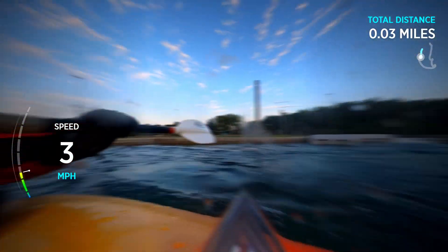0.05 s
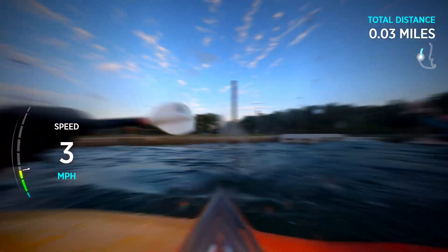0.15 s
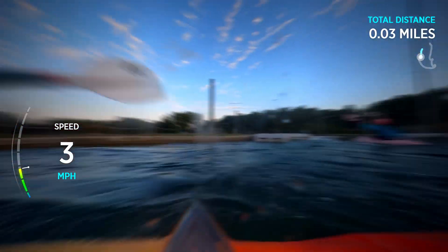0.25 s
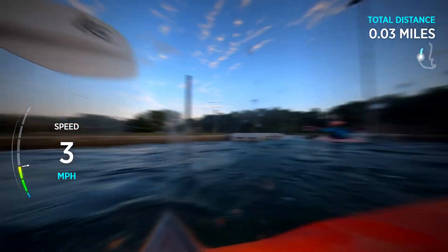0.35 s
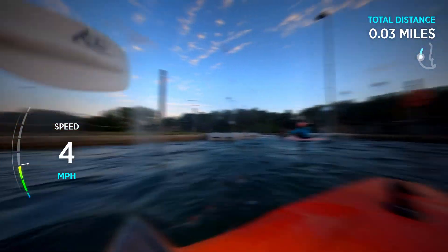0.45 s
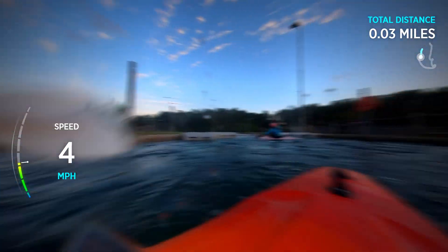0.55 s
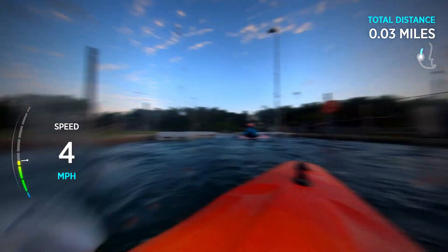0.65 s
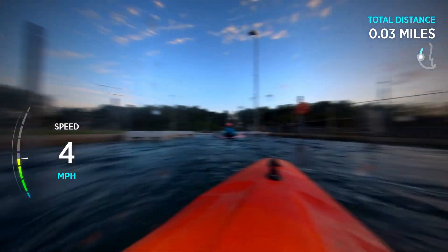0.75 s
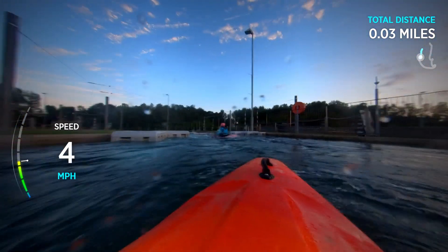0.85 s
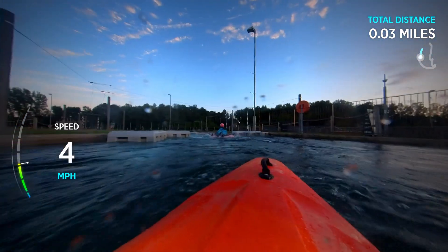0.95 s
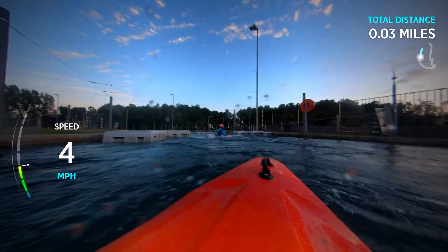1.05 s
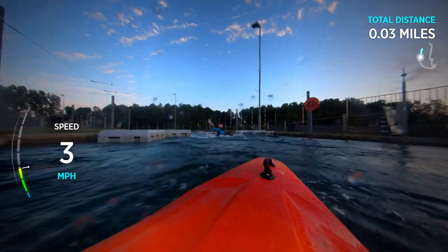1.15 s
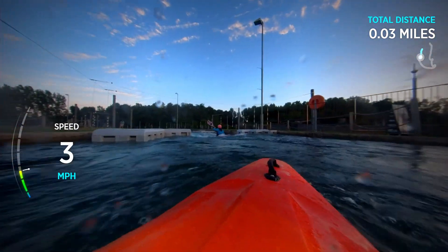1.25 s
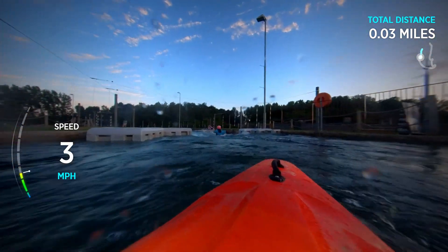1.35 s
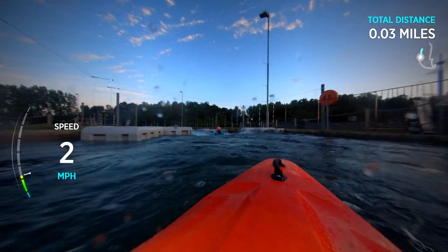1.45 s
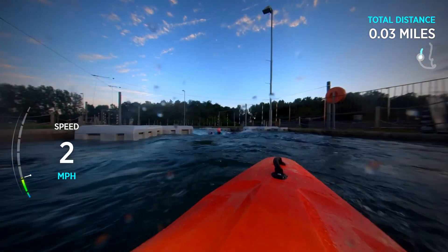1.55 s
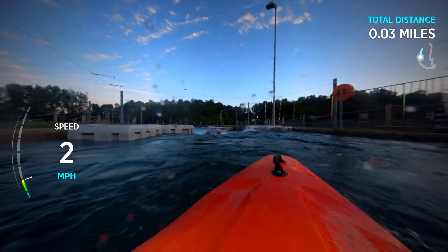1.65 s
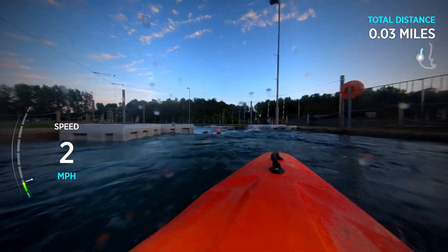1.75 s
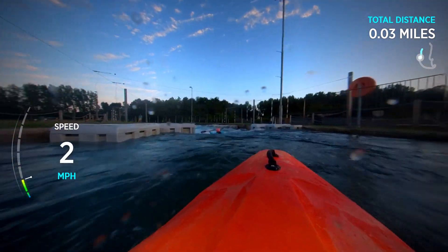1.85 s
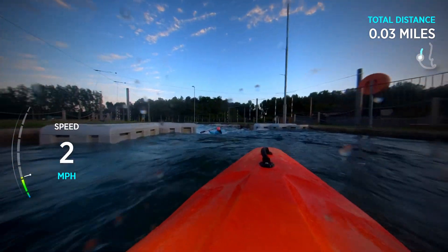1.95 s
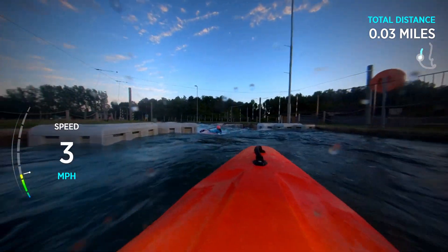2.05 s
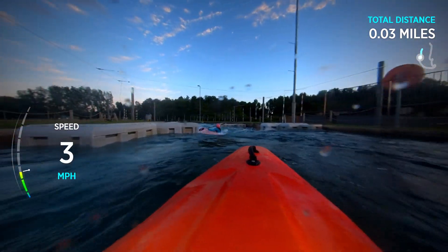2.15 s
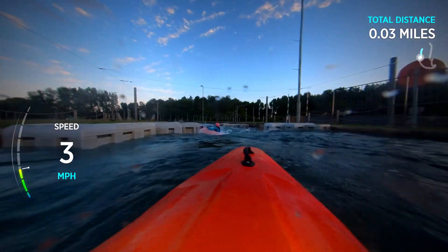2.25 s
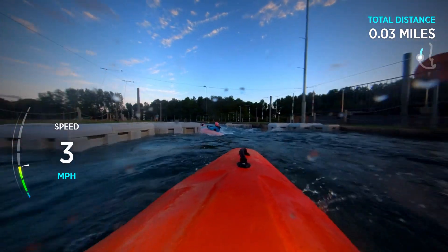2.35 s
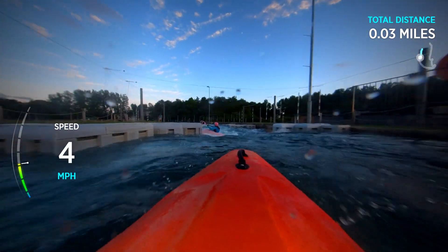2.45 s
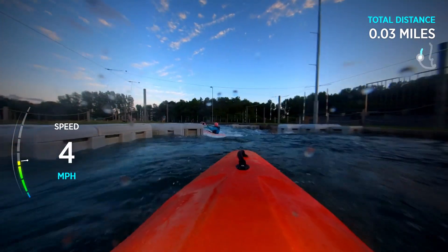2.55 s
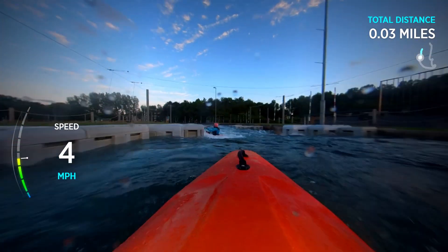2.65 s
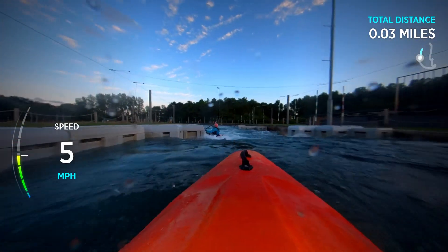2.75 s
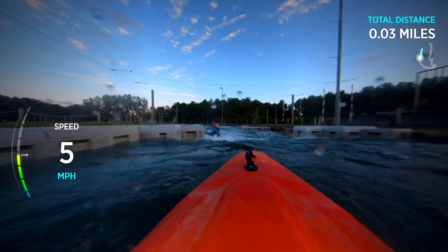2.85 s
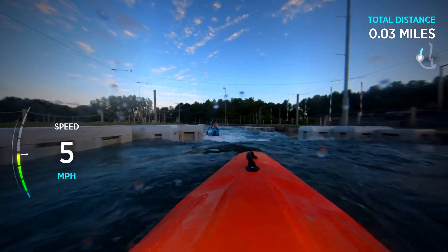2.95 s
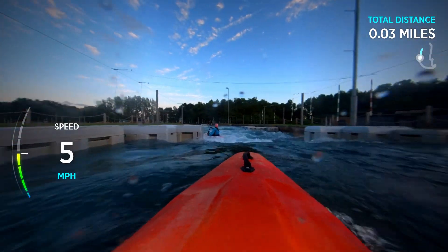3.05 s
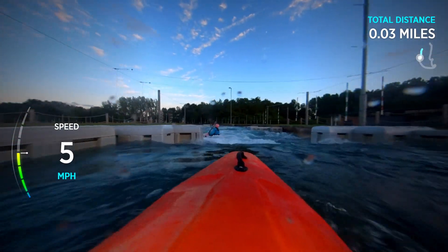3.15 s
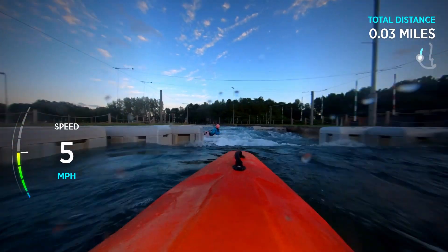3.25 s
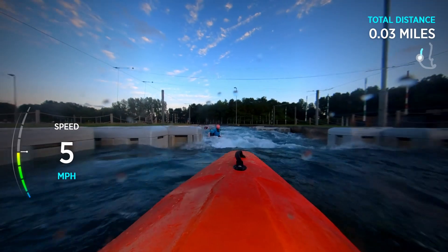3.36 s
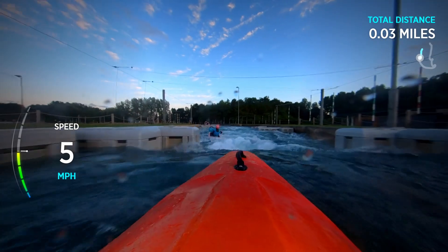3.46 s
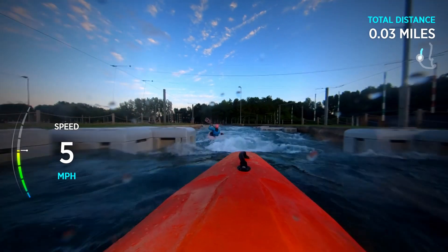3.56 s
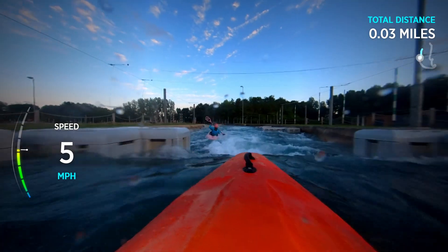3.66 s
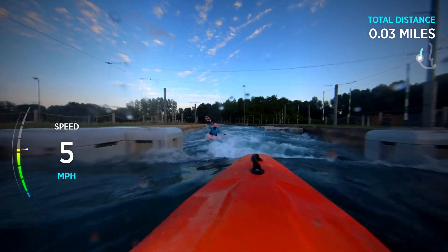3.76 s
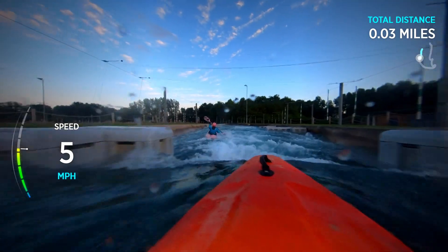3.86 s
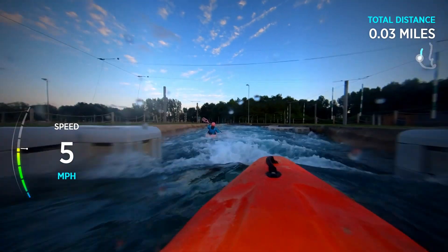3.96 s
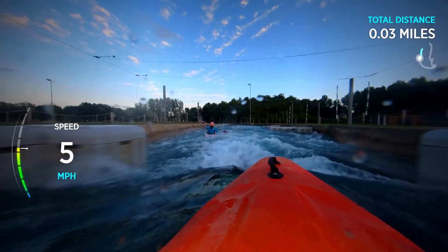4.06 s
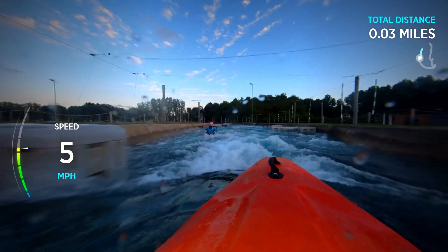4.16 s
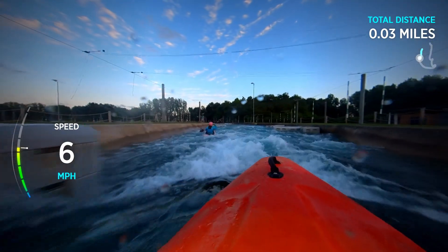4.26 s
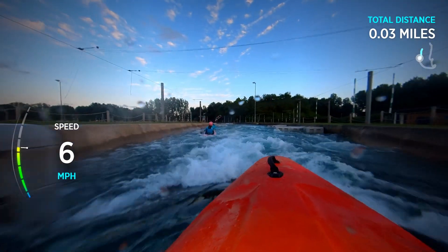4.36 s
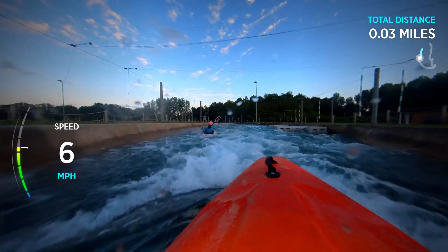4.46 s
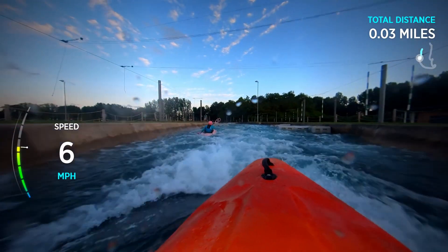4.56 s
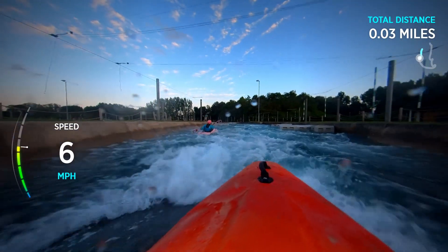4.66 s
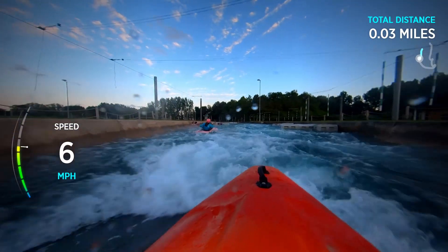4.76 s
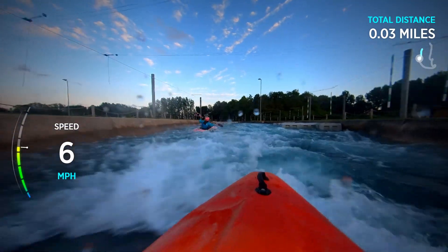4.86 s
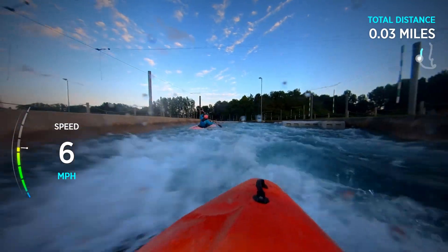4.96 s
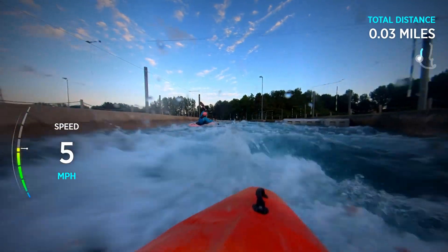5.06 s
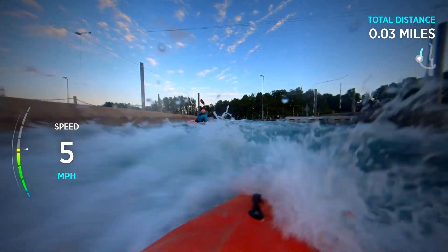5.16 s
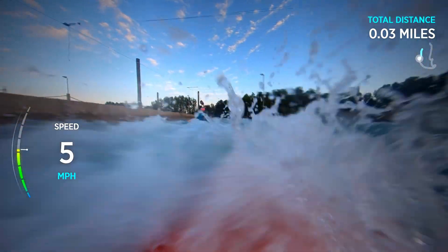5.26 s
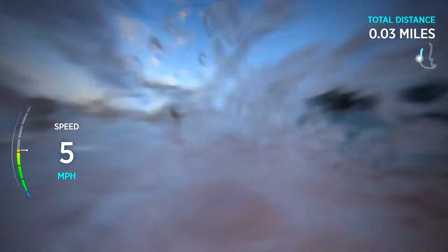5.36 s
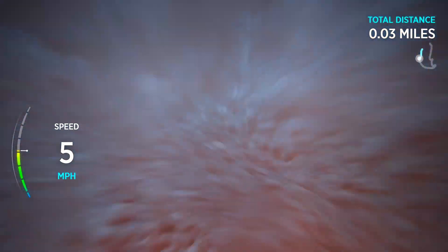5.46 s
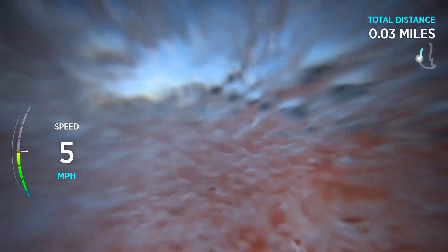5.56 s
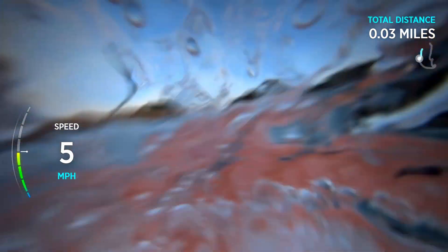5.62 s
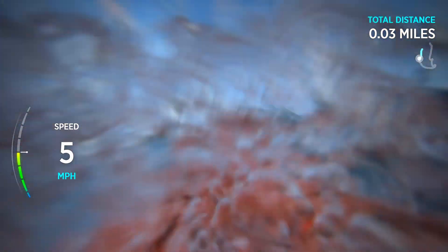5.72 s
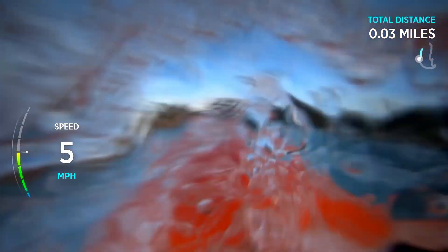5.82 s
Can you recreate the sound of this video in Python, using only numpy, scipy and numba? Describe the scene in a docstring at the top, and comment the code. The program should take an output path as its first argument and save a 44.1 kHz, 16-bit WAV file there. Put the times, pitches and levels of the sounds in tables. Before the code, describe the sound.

Water laps and rushes quietly along a plastic kayak, close and boxy through a sealed camera on the deck, with small bubbly plops and faint, brief sizzles. At about 1.2 seconds a hard, hollow knock thumps the hull, followed by a short low rumble as the mount rocks. The water stays soft, with lighter knocks, small slaps and single drops around 2.4 and 2.9 seconds. From 3.7 seconds the rush and the hiss of spray build steadily, with more bumps, a sharp drop tick near 4.6 seconds and a small splash just after. At 5.2 seconds a wave hits with several knocks and loud splashes. At 5.5 seconds it buries the bow in a gurgling, hissing wash, and drops pelt the case in a dense, sharp patter until the end, near 6 seconds.

```python
"""A sealed camera on a plastic kayak's deck, running from a pool into a breaking wave.
At first water laps and rushes quietly, ringing hull and case in fixed bands; the treble sizzles briefly,
air pockets plop. At 1.2 s a hard knock thumps the hull and the mount rocks. Lighter knocks, sheets of
water and single drops follow, and from 3.7 s the spray builds. At 5.2 s the wave hits with knocks
and splashes; at 5.5 s it buries the bow, and drops pelt the case to the end."""
import sys
import numpy as np
from scipy import signal
from scipy.fft import rfft, irfft
from scipy.io import wavfile
from scipy.ndimage import uniform_filter1d
from numba import njit

SR = 44100
rng = np.random.default_rng(int(sys.argv[2]) if len(sys.argv) > 2 else 0)


def dump(signal):
    """Clip the signal to [-1, 1] and save it as 16-bit WAV at the path in sys.argv[1]."""
    limited = np.clip(np.atleast_2d(signal).T, -1, 1)
    pcm = np.round(limited * 32767).astype(np.int16)
    wavfile.write(sys.argv[1], SR, pcm)


N = 259749

# resonances (centre [Hz], width [Hz], gain [dB])
SLOSH_BANDS = [(75.3, 27, 2), (175, 114, -3)]
HULL_BANDS = [(334.5, 39.8, -1.5), (254, 63, -12), (431, 99, -14)]
DECK_BANDS = [(580, 88, -8.5), (773, 108, 6), (889, 330, -7.5)]
GURGLE_BANDS = [(1255, 193, 2), (1580, 136, -5.5), (1905, 140, -18)]
CASE_BANDS = [(2550, 53, -13), (3010, 1180, -15), (3433, 273, -7), (4270, 430, -18)]
LID_BANDS = [(4800, 150, -10), (5285, 400, -3), (6860, 440, -5.5), (7050, 1330, -12.5)]
# lapping along the hull (time [s], hull drone [dB], slosh [dB])
LAPPING_LEVELS = [(0.0, -56.5, -67), (0.16, -70, -75), (0.39, -56, -72), (0.53, -56, -69), (0.7, -56, -70),
                  (0.95, -56.5, -69), (1.1, -52.5, -56.5), (1.24, -71, -59.5), (1.44, -58.5, -56),
                  (1.57, -57.5, -69.5), (2.07, -68.5, -77.5), (2.32, -70, -77), (2.52, -62.5, -69.5),
                  (2.81, -53, -58), (2.94, -79, -78), (3.08, -51.5, -57), (3.42, -66.5, -77),
                  (3.69, -61, -68), (3.98, -48, -56.5), (4.32, -57, -73), (4.52, -56.5, -78),
                  (4.68, -55, -75), (4.92, -50, -56.5), (5.12, -50.5, -54.5), (5.18, -47.5, -54),
                  (5.3, -45, -37), (5.4, -41.5, -38.5), (5.48, -36, -28.5), (5.53, -58, -49),
                  (5.59, -34.5, -31), (5.63, -39.5, -40.5), (5.77, -40.5, -33.5), (5.89, -47, -34.5)]
# flow over the deck (time [s], level [dB])
FLOW_LEVELS = [(0.0, -58.5), (0.31, -60.5), (0.56, -58.5), (0.67, -61), (1.71, -59), (1.86, -62),
               (2.12, -62), (2.69, -61), (2.78, -56.5), (3.11, -56), (3.23, -58), (3.81, -57.5),
               (4.09, -53), (4.47, -53.5), (4.87, -50.5), (5.05, -52.5), (5.12, -48), (5.2, -47.5),
               (5.28, -52), (5.36, -44), (5.48, -40.5), (5.53, -41), (5.59, -35.5), (5.64, -39),
               (5.77, -40), (5.89, -40)]
# spray around the case (time [s], mist [dB], hiss [dB])
SPRAY_LEVELS = [(0.0, -81, -78.5), (0.33, -87.5, -85), (0.91, -82.5, -84.5), (1.04, -74.5, -75.5),
                (1.2, -78, -79.5), (1.37, -78, -85), (1.59, -84.5, -83.5), (1.9, -85, -87),
                (2.1, -84, -81.5), (2.45, -79, -84), (2.65, -87, -83), (2.84, -74, -68.5),
                (3.04, -73.5, -77.5), (3.29, -76.5, -79), (3.52, -73.5, -82), (3.74, -69, -73),
                (3.87, -66.5, -67.5), (4.18, -66, -70), (4.49, -62, -66), (4.77, -61, -61),
                (5.07, -55.5, -60), (5.2, -55, -54.5), (5.27, -65.5, -61), (5.44, -54.5, -51.5),
                (5.5, -44, -39), (5.63, -46, -40), (5.77, -46, -37.5), (5.89, -49, -44.5)]
# mount on the swell (time [s], level [dB])
ROCKING_LEVELS = [(0.0, -83), (0.11, -53.5), (0.34, -81), (0.43, -70), (0.56, -78), (1.0, -80),
                  (1.21, -22.5), (1.28, -32), (1.31, -54), (1.46, -42.5), (1.54, -67), (1.72, -44.5),
                  (2.07, -77.5), (2.36, -61), (2.39, -53.5), (2.92, -54), (2.97, -35), (3.56, -67),
                  (3.87, -39.5), (4.1, -61), (4.15, -39), (4.38, -63.5), (4.61, -39), (4.92, -48.5),
                  (5.12, -28), (5.18, -47), (5.27, -26), (5.32, -50), (5.36, -26), (5.54, -57),
                  (5.58, -37.5), (5.89, -39)]


def water():
    """Rushing water rocks the mount and rings hull and deck; spray rings the case and its lid."""
    laps = patter(rate_hz=36, spread_db=4.0, tail_s=0.0024)
    drops = patter(rate_hz=51, spread_db=2.5, tail_s=0.004)

    rocking = undb(curve(ROCKING_LEVELS)) * mount_swing()
    slosh = undb(curve(LAPPING_LEVELS, column=2)) * rush(SLOSH_BANDS, laps, 0.59, 1.7)
    hull = undb(curve(LAPPING_LEVELS)) * rush(HULL_BANDS, laps ** 0.56, 0.6, 0.51)
    flow_db = curve(FLOW_LEVELS)
    flow = undb(flow_db) * rush(DECK_BANDS, laps ** 0.8, 0.97, 0.73)
    gurgle_db = submerge(flow_db, base_db=-65.5, slope=1.13, step_db=6.7)
    gurgle = undb(gurgle_db) * rush(GURGLE_BANDS, laps ** 0.73, 3.4, 2.6)

    mist_db, hiss_db = curve(SPRAY_LEVELS), curve(SPRAY_LEVELS, column=2)
    fine_db = submerge((mist_db + hiss_db) / 2, base_db=-61.5, slope=0.92, step_db=3.1)
    sparse = np.clip((-53.5 - mist_db) / 16, 0.25, 1)  # dense foam rings all bands evenly
    drops = drops ** (1.25 - sparse)  # more patter where foam flies
    hiss = undb(hiss_db) * rush(CASE_BANDS, drops ** 0.62, 1.9, 4.4 * sparse)
    fine = undb(fine_db) * rush(LID_BANDS[:2], drops ** 0.42, 4.6, 1.8 * sparse)
    mist = undb(mist_db) * rush(LID_BANDS[2:], drops ** 0.8, 3.1, 3.1 * sparse)
    return through_mount(rocking + slosh + hull + flow + gurgle) + hiss + fine + mist


def rush(bands, gusts, flicker_db, swell_db):
    """Turbulence rings each band; all share the gusts, each flickers and swells alone."""
    out = 0
    for hz, width_hz, db in bands:
        level_db = db + flicker_db * walk(16) + swell_db * walk(6)
        out = out + undb(level_db) * steep_band(gusts * rng.standard_normal(N), hz, width_hz)
    return unit(out)


def patter(rate_hz, spread_db, tail_s):
    """Gain that jumps as drops and small waves land, each dying over a short tail."""
    hits = (rng.random(N) < rate_hz / SR) * undb(spread_db * rng.exponential(size=N))
    fade = np.exp(-1 / (tail_s * SR))
    return np.sqrt(1 + signal.lfilter([1], [1, -fade], hits ** 2))


def mount_swing(hz=26.57):
    """The mount swings at its lowest mode with a fairly even stroke."""
    swing = steep_band(rng.standard_normal(N), hz, 13.67)
    swing /= np.abs(signal.hilbert(swing)) ** 0.83 + 1e-6
    return unit(bandpass(swing, hz, 45.0))


def submerge(control_db, base_db, slope, step_db, under_s=5.5, sink_s=0.026):
    """Level in dB that rises with a control and steps up as the bow goes under."""
    under = np.clip((np.arange(N) / SR - under_s) / sink_s, 0, 1)
    return base_db + slope * (control_db + 60) + step_db * under


# hull and mount modes (frequency [Hz], gain [dB], t60 [s])
EDGE_MODES = [(715.5, -1.5, 0.068), (838, 8, 0.019), (990, -20, 0.045), (1158, -11, 0.041)]
THUMP_MODES = [(295.4, 1, 0.14), (334, 6.5, 0.058), (426, -8.5, 0.046)]
THUD_MODES = [(166.3, 5, 0.073), (193.2, -8.5, 0.21)]
BOOM_MODES = [(66.4, -4, 0.18), (82.7, -4, 0.19), (112.4, -16.5, 0.41)]
ROCK_MODES = [(26.57, -27.5, 1), (32.2, -5, 0.35)]
# blows (time [s], thump peak [dB], boom [dB re thump], thud [dB re thump], edge [dB re thump])
HULL_KNOCKS = [(0.369, -43.5, -3.5, -7.5, 3), (0.925, -39.5, -28, -11, -18),
               (1.168, -12.5, -13.5, -4, -14.5), (1.189, -29.5, 1.5, -19, -18), (2.376, -30, 1, -2, 9.5),
               (2.927, -26, -5.5, -2, 3.5), (2.966, -32, 1.5, -14, 0.5), (4.09, -31.5, -8, -1.5, -1),
               (4.511, -35, -4.5, 1, -3), (4.565, -40, -6.5, -2, 3), (5.205, -22.5, -8.5, -4.5, -13),
               (5.235, -21, -0.5, -0.5, -21), (5.339, -28, -11.5, 0, -30), (5.45, -19.5, -9.5, -2, 3.5),
               (5.479, -45, -13, -24, -18), (5.586, -28, -4, -11, 4.5)]


def knocks(contact_s=0.0022):
    """Blows on the hull: edge and thump first, then boom, then the mount rocks on."""
    out, t = np.zeros(N), np.arange(SR // 20) / SR
    for start_s, db, boom_db, thud_db, edge_db in HULL_KNOCKS:
        # grinding contact strikes the edge many times
        grind = rng.standard_normal(len(t)) * t * np.exp(-2 * t / contact_s)
        edge = signal.fftconvolve(ring(EDGE_MODES, 0), grind)[:SR // 2]
        edge = peak(bandpass(edge, 634.0, 610.0), db + edge_db)
        thump = ring(THUMP_MODES, db)
        thud = ring(THUD_MODES, db + thud_db)
        rock = ring(ROCK_MODES, db + boom_db - 10.5)
        boom = ring(BOOM_MODES, db + boom_db)
        add(out, start_s, edge + thump + thud + rock + boom)
    return through_mount(out)


def ring(modes, peak_db, late_cycles=0.44, damp_db=3, damp_s=0.012):
    """Struck modes: each blow lands elsewhere and weights them anew; water damps them unevenly."""
    out, t = 0, np.arange(SR // 2) / SR
    for hz, db, t60_s in modes:
        size, detune = rng.standard_normal(2)
        age_s = np.maximum(t - late_cycles / hz, 0)  # bending waves are slower in the bass
        envelope = (1 - np.exp(-1.23 * hz * age_s)) * decay(age_s, t60_s)
        tone = np.sin(2 * np.pi * hz * (1 + 0.011 * detune) * age_s)
        out = out - undb(db + 1.9 * size) * envelope * tone
    damping = unit(smooth(rng.standard_normal(len(t)), int(damp_s * SR)))
    return peak(out * undb(damp_db * damping), peak_db)


# sheets of water (time [s], deck peak [dB], gurgle [dB re deck], case peak [dB], t60 [s])
WATER_SHEETS = [(0.039, -43.5, -9.5, -83, 0.16), (0.842, -45, -9, -85, 0.054),
                (0.906, -46.5, -4, -58, 0.075), (0.924, -41, -6, -55.5, 0.096),
                (1.384, -33, -3, -62, 0.076), (1.576, -43, -27, -94, 0.11),
                (2.376, -29.5, 0.5, -45.5, 0.069), (2.591, -57, 3, -85, 0.039),
                (2.609, -52, -2, -62.5, 0.22), (2.664, -45.5, -4.5, -58.5, 0.21),
                (2.712, -39, -8, -73, 0.081), (2.965, -35, -11, -52, 0.078), (3.049, -44.5, -13, -81, 0.07),
                (3.098, -40.5, -26, -68, 0.037), (3.27, -42.5, -20, -75, 0.026),
                (3.469, -64, -18, -63.5, 0.17), (3.672, -74, -17, -58, 0.084),
                (3.923, -46, -3.5, -56.5, 0.13), (4.227, -49.5, 0, -74, 0.082),
                (4.763, -38, 3, -41.5, 0.13), (4.784, -40, 6.5, -53, 0.063),
                (5.206, -30, -3.5, -37.5, 0.12), (5.233, -20, -1.5, -42, 0.049),
                (5.424, -20.5, 0.5, -21.5, 0.015), (5.453, -20, -20, -23.5, 0.12),
                (5.464, -32, 17.5, -23.5, 0.044), (5.477, -34, 9, -29, 0.12),
                (5.541, -40.5, 10, -28.5, 0.12), (5.585, -28, -3.5, -25, 0.095),
                (5.614, -47, -10, -29, 0.033), (5.635, -30, 7, -22, 0.014), (5.654, -23, -5, -25.5, 0.064),
                (5.735, -32, 5, -24, 0.038), (5.756, -27, -8, -22, 0.065), (5.788, -39, -5, -26, 0.059),
                (5.821, -42, 14.5, -23.5, 0.017)]


def sheets():
    """Sheets of water slap deck and case, ringing the bands of the rush at twice the width."""
    deck, case, t = np.zeros(N), np.zeros(N), np.arange(SR // 5) / SR
    for start_s, deck_db, gurgle_db, case_db, t60_s in WATER_SHEETS:
        hold_s = 0.13 * t60_s
        rise_s = 0.0002 + 0.074 * hold_s
        envelope = np.minimum(t / rise_s, 1) * decay(t - hold_s, t60_s)
        for out, bands, peak_db in ((deck, DECK_BANDS, deck_db),
                                    (deck, GURGLE_BANDS, deck_db + gurgle_db),
                                    (case, CASE_BANDS, case_db),
                                    (case, LID_BANDS[:2], case_db - 2),
                                    (case, LID_BANDS[2:], case_db - 8)):
            burst = envelope * rng.standard_normal(len(t))
            slap = sum(undb(db) * steep_band(burst, hz, 2 * width_hz) for hz, width_hz, db in bands)
            add(out, start_s, peak(slap, peak_db))
    return through_mount(deck) + case


# single drops on the case (time [s], peak [dB], centre [Hz], spread [oct])
CASE_DROPS = [(0.9055, -48.5, 3470, 0.27), (1.385, -45, 2320, 0.1), (1.402, -45, 2340, 0.2),
              (2.376, -38.5, 1970, 0.43), (2.732, -46, 4240, 0.091), (2.7632, -49.5, 2630, 0.42),
              (2.818, -51, 3730, 0.27), (2.8594, -51, 7750, 0.14), (2.9555, -33.5, 3280, 0.7),
              (3.1492, -53, 5000, 0.15), (3.1753, -46.5, 6960, 0.18), (3.216, -48, 3700, 0.7),
              (4.56, -23.5, 5000, 0.16), (4.5653, -33, 5130, 0.7), (5.236, -14, 4600, 0.44),
              (5.2424, -23, 3280, 0.45), (5.4256, -26.5, 3600, 0.41), (5.439, -23, 3520, 0.32),
              (5.466, -18, 5400, 0.59), (5.4891, -21, 3500, 0.43), (5.7492, -13, 5680, 0.4),
              (5.806, -20.5, 3620, 0.45), (5.8689, -13, 4850, 0.43)]


def drop_ticks(smear_s=0.002, lag_s=0.0014):
    """A drop's click crosses the case as a bending wave and arrives treble first."""
    out, t = np.zeros(N), np.arange(2048) / SR
    hz = np.maximum(np.fft.rfftfreq(len(t), 1 / SR), 100)
    delay_s = lag_s * np.maximum(np.log2(8000 / hz), 0) ** 1.4 + 0.00111
    dispersion = np.exp(-2j * np.pi * np.cumsum(delay_s) * SR / len(t))
    bands = CASE_BANDS[2], *LID_BANDS[:3]
    case = 0.2 + sum(1 / (1 + ((hz - band_hz) / width_hz) ** 2) for band_hz, width_hz, _ in bands)
    for start_s, db, centre_hz, spread_oct in CASE_DROPS + pelting():
        click = rng.standard_normal(len(t)) * np.exp(-t / smear_s)
        distance = (np.log2(hz / centre_hz) / max(spread_oct, 0.1)) ** 2
        colour = case * (np.exp(-distance) + 0.72 * np.exp(-distance / 9))
        tick = irfft(rfft(click) * colour * dispersion)
        add(out, start_s - 0.002, peak(tick, db))
    return out


def pelting(start_s=5.45, rate_hz=270, floor_db=-41, scatter_db=2.5):
    """The wave throws drops of random size and pitch at the case; rows as in CASE_DROPS."""
    gap, size, pitch = rng.random((400, 3)).T
    times_s = start_s - np.cumsum(np.log(1 - gap)) / rate_hz
    peaks_db = floor_db - scatter_db * np.log(1 - size)
    centres_hz = 750 * 2 ** (3.06 * pitch)
    return [(s, db, hz, 0.25) for s, db, hz in zip(times_s, peaks_db, centres_hz) if s < N / SR]


# trapped air (time [s], peak [dB], pitch [Hz], t60 [s])
AIR_POCKETS = [(0.363, -38, 1080, 0.027), (0.564, -43, 760, 0.042), (0.767, -45.5, 800, 0.052),
               (0.842, -57, 1650, 0.043), (0.938, -37, 765, 0.046), (0.9401, -42.5, 1820, 0.034),
               (1.3, -45, 900, 0.038), (1.392, -41, 860, 0.026), (1.59, -39, 767, 0.049),
               (1.6503, -51.5, 1760, 0.06), (2.592, -56, 1680, 0.045), (2.6636, -54.5, 2950, 0.023),
               (2.7132, -50, 1880, 0.032), (2.728, -44.5, 1990, 0.025), (2.733, -43, 780, 0.035),
               (2.7636, -53, 2540, 0.03), (2.9576, -37, 1594, 0.086), (4.621, -32, 912, 0.022),
               (4.77, -34.5, 1391, 0.09), (5.454, -31, 875, 0.04), (5.518, -29, 1130, 0.05),
               (5.67, -17.5, 877, 0.011), (5.753, -15, 1204, 0.058)]


def plops():
    """Air pockets ring briefly, a little hoarse, rising as they shrink; water muffles them."""
    out, t = np.zeros(N), np.arange(SR // 8) / SR
    for start_s, db, hz, t60_s in AIR_POCKETS:
        envelope = (1 - np.exp(-t / 0.0025)) ** 2 * decay(t, t60_s)
        tone = np.sin(2 * np.pi * hz * t * (1 + 1.36 * t))
        rasp = unit(steep_band(rng.standard_normal(len(t)), hz, 0.59 * hz))
        muffled = steep_band(envelope * (tone + 0.53 * rasp), hz, 0.35 * hz)
        add(out, start_s - 0.001, peak(muffled, db))
    return out


# narrow-band sizzles (time [s], level [dB], centre [Hz], hold [s])
TREBLE_SIZZLES = [(0.0, -78.5, 5280, 0.15), (0.0, -83, 3390, 0.12), (0.0, -82, 7360, 0.18),
                  (0.32, -85, 3430, 0.071), (0.534, -77.5, 5350, 0.1), (0.967, -74, 6820, 0.2),
                  (0.997, -80, 3470, 0.18), (1.302, -78, 3490, 0.13), (1.298, -70.5, 6850, 0.11),
                  (1.307, -80, 5070, 0.1), (1.86, -86, 3380, 0.099), (2.029, -80, 5230, 0.1),
                  (2.035, -82, 3400, 0.057), (2.607, -72.5, 6780, 0.16), (2.619, -71.5, 5100, 0.15),
                  (3.031, -75, 3450, 0.24), (3.042, -74, 6940, 0.23), (3.67, -68, 6940, 0.073),
                  (3.686, -71, 3470, 0.21)]


def sizzles(rise_s=0.005, t60_s=0.2, flicker_db=3.5):
    """Brief narrow-band treble sizzles start abruptly, flicker and fade."""
    out, t = np.zeros(N), np.arange(SR // 2) / SR
    for start_s, db, hz, hold_s in TREBLE_SIZZLES:
        envelope = np.minimum(t / rise_s, 1) * decay(t - hold_s, t60_s)
        sizzle = unit(steep_band(rng.standard_normal(len(t)), hz, 0.03 * hz))
        add(out, start_s, undb(db) * envelope * sizzle)
    return out * undb(flicker_db * walk(30))


def through_mount(x, cutoff_hz=2060):
    """Hull and mount pass little treble."""
    return signal.sosfilt(signal.butter(4, cutoff_hz, fs=SR, output="sos"), x)


@njit
def bandpass(x, hz, width_hz):
    """State-variable band-pass, gain 1 at the centre."""
    y, band, low = np.empty(len(x)), 0., 0.
    g, damping = np.tan(np.pi * hz / SR), width_hz / hz
    for i in range(len(x)):
        v = (band + g * (x[i] - low)) / (1 + g * (g + damping))
        band, low = 2 * v - band, low + 2 * g * v
        y[i] = damping * v
    return y


def steep_band(x, hz, width_hz):
    """Resonance with steep flanks."""
    for _ in range(3):
        x = bandpass(x, float(hz), 2.515 * width_hz)
    return x


def walk(rate_hz):
    """Smoothed random steps, spread near 1."""
    hold = int(SR / rate_hz)
    steps = np.repeat(rng.standard_normal(N // hold + 1), hold)
    return 1.2 * smooth(steps, hold)[:N]


def smooth(x, samples):
    return uniform_filter1d(uniform_filter1d(x, samples), samples)


def curve(rows, column=1):
    """Table column, interpolated over time."""
    rows = np.array(rows)
    return np.interp(np.arange(N) / SR, rows[:, 0], rows[:, column])


def decay(t, t60_s):
    """1 until t = 0, then down 60 dB per t60_s."""
    return np.exp(-np.log(1000) * np.maximum(t, 0) / t60_s)


def add(out, start_s, x):
    i = int(start_s * SR)
    out[i:i + len(x)] += x[:N - i]


def undb(db):
    return 10 ** (np.asarray(db) / 20)


def unit(x):
    return x / np.sqrt(np.mean(x ** 2))


def peak(x, db):
    return x * undb(db) / np.abs(x).max()


def scene():
    """Mono mix at the camera."""
    return (water() + knocks() + sheets() + drop_ticks() + plops() + sizzles())[None]


def record(dry, seal_hz=7970, top_hz=9150, mic_db=-79.5, hiss_db=-95):
    """The sealed port dulls sound and microphone hiss; the recorder cuts the top and adds its own hiss."""
    mic = dry + undb(mic_db) * rng.standard_normal(dry.shape)
    sealed = signal.sosfilt(signal.butter(4, seal_hz, fs=SR, output="sos"), mic)
    cut = signal.sosfilt(signal.cheby1(10, 0.5, top_hz, fs=SR, output="sos"), sealed)
    hiss = undb(hiss_db) * rng.standard_normal(dry.shape)
    return cut + signal.sosfilt(signal.ellip(8, 0.5, 60, 15500, fs=SR, output="sos"), hiss)


dry = scene()
out = record(dry)
dump(out)
```